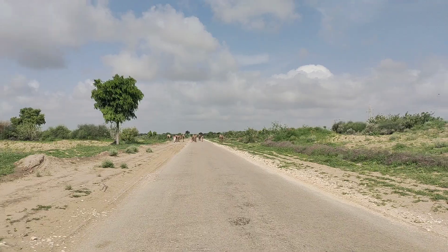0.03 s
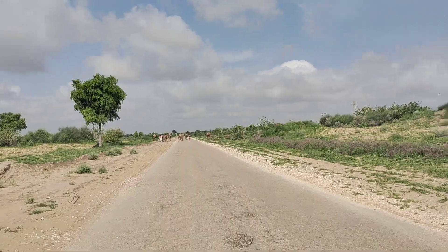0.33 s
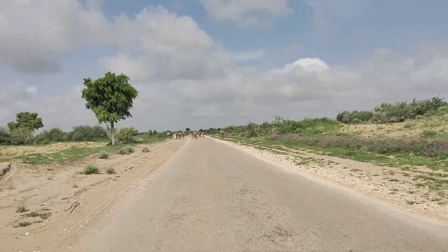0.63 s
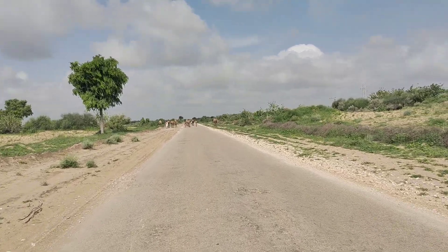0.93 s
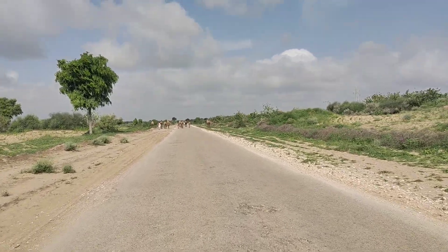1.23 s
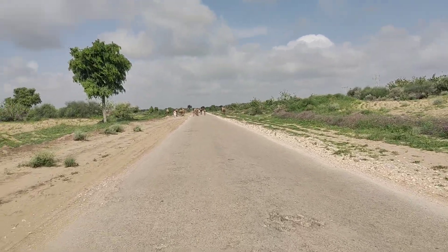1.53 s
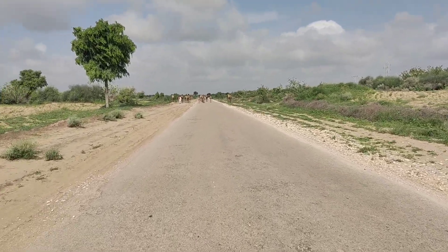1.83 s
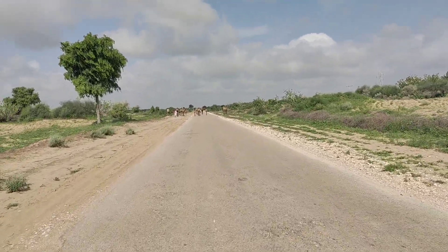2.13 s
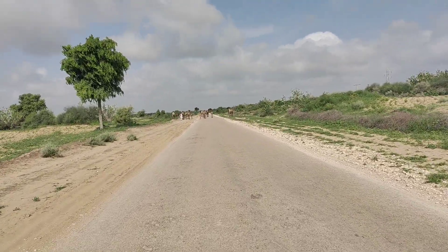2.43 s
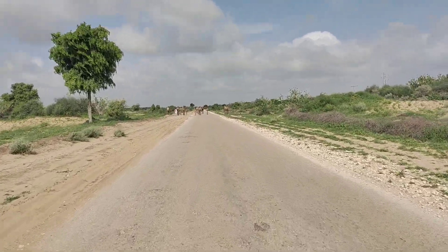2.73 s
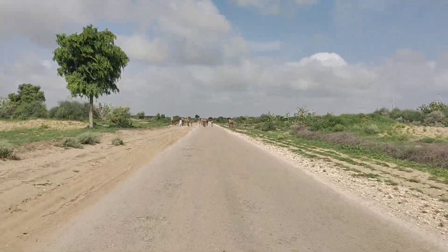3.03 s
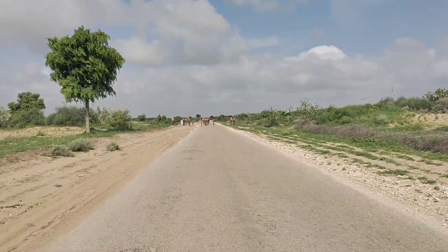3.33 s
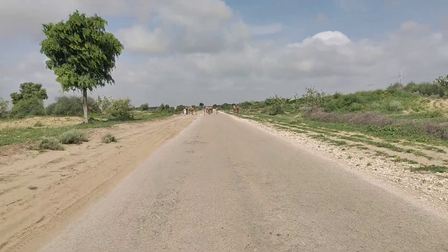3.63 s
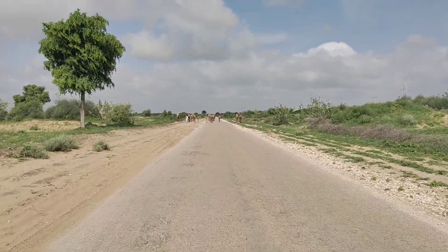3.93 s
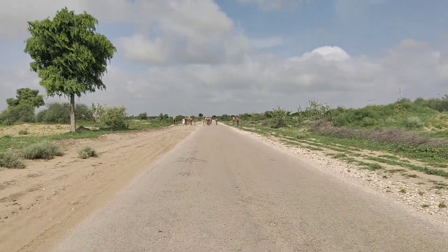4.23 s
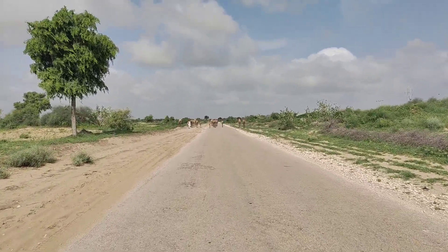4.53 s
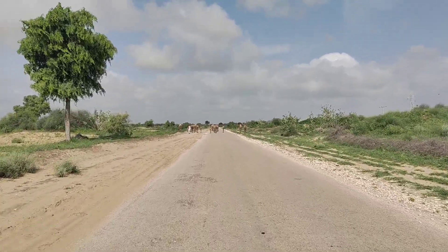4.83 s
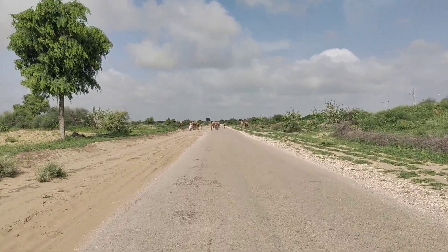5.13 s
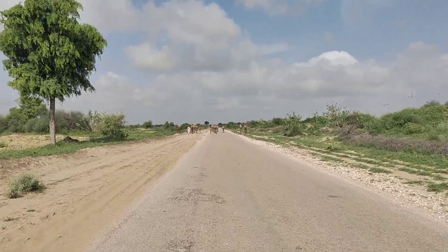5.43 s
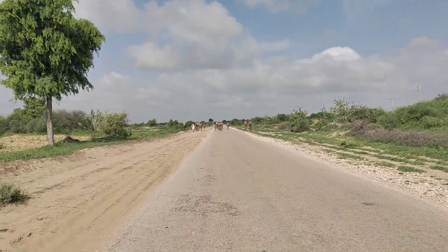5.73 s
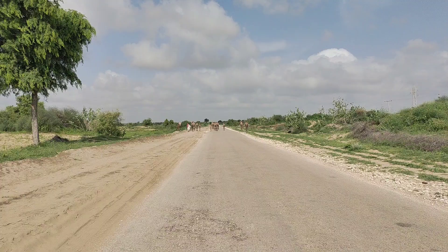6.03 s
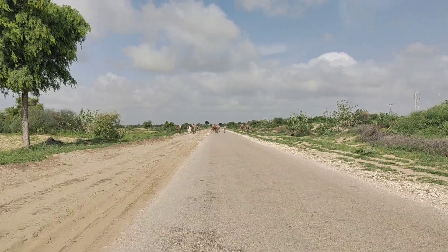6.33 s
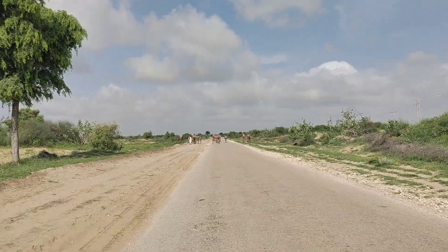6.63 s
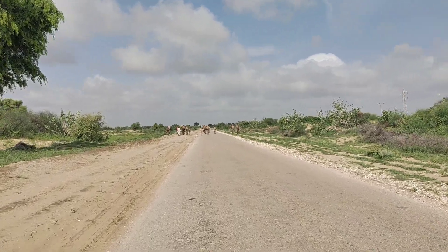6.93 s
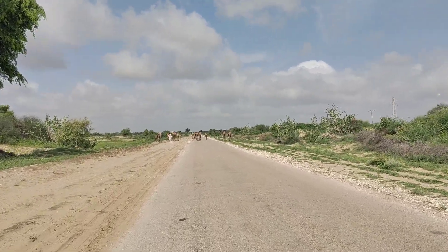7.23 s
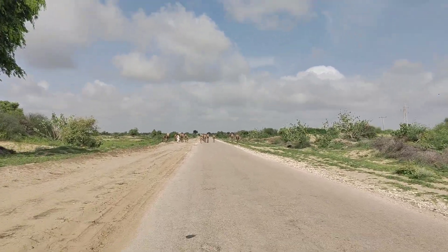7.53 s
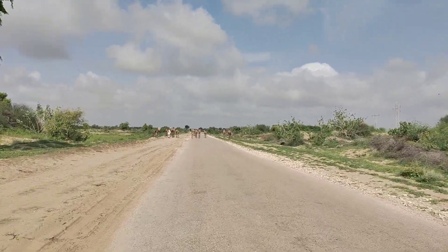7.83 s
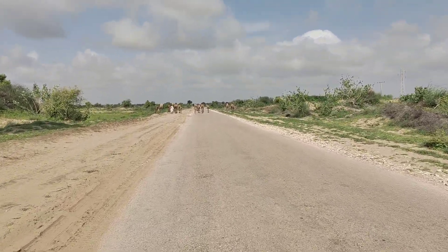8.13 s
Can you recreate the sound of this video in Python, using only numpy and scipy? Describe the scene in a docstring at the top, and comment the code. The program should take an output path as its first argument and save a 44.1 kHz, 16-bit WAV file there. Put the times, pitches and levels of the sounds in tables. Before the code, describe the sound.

A small motorbike rides along a country road, heard almost entirely on the left. Wind rumbles on the microphone, then eases, leaving a faint, steady engine tick, tyre hiss and a few soft hoots of air. The wind returns stronger, with low thumps, flutter and crackling spits that cover most of the bike. Near the end a loose part rattles lightly.

```python
"""Gusts of head wind rumble and thump on the left microphone port of a small motorbike on a country road.
The wind eases early on and returns stronger: large eddies give the rumble and the thumps, small ones
flutter, crackle and spit. Beneath it a single-cylinder engine ticks and rings its casing, the tyres hiss,
air hoots across the bodywork and a loose part rattles on rough patches. The right port is almost deaf."""
import sys
import numpy as np
from scipy import signal
from scipy.fft import rfft, irfft, next_fast_len
from scipy.io import wavfile
from scipy.ndimage import uniform_filter1d

SR = 44100
rng = np.random.default_rng(int(sys.argv[2]) if len(sys.argv) > 2 else 0)


def inscribe(sig):
    """Save sig as 16-bit PCM at rate SR to the path in sys.argv[1].

    A 1-D sig is mono; a 2-D sig holds one channel per row.
    Samples are clipped to [-1, 1] before scaling.
    """
    pcm = np.round(np.clip(np.atleast_2d(sig).T, -1, 1) * 32767)
    wavfile.write(sys.argv[1], SR, pcm.astype(np.int16))


N = 361179
TIME = np.arange(N) / SR

# Levels in the tables are relative: each source adds its own gain.
# faint puffs on the right port: start_s, length_s, level_db
RIGHT_PORT_PUFFS = [(.48, .1, -57), (1.64, 0.15, -60), (2.66, 0.073, -59), (2.97, 0.56, -58),
                    (3.6, 0.11, -53), (6.268, 0.3, -66.5), (8.09, .09, -59)]
# engine speed: time_s, firing_rate_hz
FIRING_RATE = [(0, 14.58), (1.2, 14.78), (2.4, 14.88), (3.4, 14.88), (4.4, 14.74), (5.4, 14.43),
               (6.6, 14.46), (8.2, 14.55)]
# mechanical ticks in one four-stroke cycle: cycle_fraction, strength_ratio
CYCLE_TICKS = [(.2, 1), (.49, 0.64), (.93, 0.3)]
# resonances of the engine casing: pitch_hz, width_hz, gain_db
CASING_MODES = [(789, 17, 9), (973, 68, 3.5), (1270, 15, 8), (1514, 52, 4.5), (1892, 37, 6), (2083, 32, -2),
                (2645, 10, -2.5), (3480, 53, 1), (3880, 88, -14.5)]
# bright engine clatter and road hiss: time_s, clatter_db, hiss_db
RIDE_LEVELS = [(.3, -55, -63), (1.1, -56, -61), (2.3, -56.5, -68), (2.85, -57.5, -66.5), (3.1, -56, -65),
               (3.6, -55.5, -66.5), (4.25, -55, -60.5), (4.6, -55, -62), (5.8, -56.5, -66),
               (6.95, -54, -62), (8.19, -54, -62)]
# brief dips of the bike's treble: start_s, length_s, gain_db
TREBLE_DIPS = [(3.013, 0.085, -5), (3.16, 0.21, -7), (3.937, 0.16, -6), (6.64, 0.12, -6.5)]
# top treble of the hiss: time_s, lift_db
HISS_TOP_LIFT = [(0.3, -6), (2.4, 9.5), (3.7, 7.5), (4.8, -11), (6.4, -7), (8.19, -6)]
# bands that sink in the hiss: start_s, length_s, centre_hz, width_hz, gain_db
HISS_HOLLOWS = [(1.77, 1.1, 4300, 2200, -2.5), (1.7, 1.2, 8400, 2500, -2.5), (4.4, 2.9, 8100, 760, -2.5)]
# faint rings in the hiss: start_s, length_s, pitch_hz, width_hz, level_db
HISS_RINGS = [(.3, 1.5, 5190, 220, -72), (1.796, 1.2, 6520, 600, -76), (1.8, 2.1, 5200, 90, -83),
              (3.4, 0.55, 5200, 300, -73), (4.15, 4.9, 7350, 900, -75)]
# air hooting across an opening in the bodywork: time_s, pitch_hz, level_db
BODYWORK_HOOTS = [(1.131, 454, -31), (1.24, 485, -43), (1.40, 461, -41.5), (1.56, 480, -39),
                  (1.80, 453, -37), (1.98, 466, -39)]
# knocks and light clinks of the loose part: time_s, peak_db
PART_KNOCKS = [(1.052, -44), (1.091, -40), (6.596, -36.5), (6.609, -33.5), (7.458, -35.5), (7.55, -31.5),
               (7.642, -40), (7.949, -32.5), (7.961, -42), (8.134, -34)]
PART_CLINKS = [(6.557, -46), (6.633, -43), (7.3397, -51), (7.3627, -44), (7.444, -42), (7.5785, -41),
               (8.0103, -39)]
# head wind under the gusts: time_s, rumble_db
HEAD_WIND = [(0.3, -19.5), (0.58, -24.5), (0.8, -32), (1.35, -37), (1.85, -37), (2.35, -41), (2.6, -25),
             (3.3, -29), (3.4, -26.5), (4.2, -28.5), (4.6, -23.5), (4.72, -26.5), (4.85, -25), (5.4, -25),
             (5.7, -22), (7.03, -21.5), (7.17, -26.5), (7.4, -21.5), (7.97, -23), (8.08, -28)]
# gusts on the left port: start_s, length_s, rumble_db, eddies_above_rumble_db
LEFT_PORT_GUSTS = [(0.336, 0.057, -18, -13.5), (0.401, 0.17, -22.5, -16.5), (0.6, 0.062, -35, -30),
                   (1.086, 0.043, -27, -26), (1.23, 0.049, -31.5, -25), (1.537, 0.065, -33, -21.5),
                   (1.982, 0.064, -34, -22), (2.393, 0.094, -26, -30), (2.672, 0.16, -24.5, -21.5),
                   (2.932, 0.087, -18, -33), (3.085, 0.23, -20, -28.5), (3.52, 0.045, -23.5, -21),
                   (3.69, 0.085, -20.5, -19), (3.764, 0.09, -21, -16.5), (3.91, 0.026, -15.5, -20),
                   (3.989, 0.028, -19.5, -15.5), (4.086, 0.17, -21.5, -16), (4.306, 0.036, -21, -11),
                   (4.376, 0.084, -23, -16), (4.452, 0.16, -25.5, -20), (4.778, 0.16, -24.5, -15),
                   (4.984, 0.071, -21, -17.5), (5.24, 0.14, -32.5, -10.5), (5.433, 0.66, -22, -13.5),
                   (6.111, 0.12, -23.5, -12), (6.336, 0.15, -27, -10), (6.463, 0.047, -16.5, -19.5),
                   (6.588, 0.16, -28, -8.5), (6.828, 0.059, -19.5, -16), (7.236, 0.29, -26, -15.5),
                   (7.747, 0.094, -24, -15)]
# weight of the lowest rumble: time_s, lift_db
DEEP_RUMBLE_LIFT = [(0.3, 12), (1.6, 7), (3.2, 7.5), (4.8, 8.5), (5.8, 14), (6.7, 6.5), (7.5, 7)]
# single large eddies striking the port: time_s, thump_db, pop_db
LARGE_EDDIES = [(0.328, -28, -20), (0.368, -17, -35), (0.404, -15, -31), (0.433, -11, -38),
                (0.462, -29, -21), (0.551, -20, -25), (2.714, -8, -21), (2.825, -6, -19.5),
                (2.857, -11.5, -23.5), (2.95, -13, -43), (2.976, -19, -39), (3.0138, -10.5, -24),
                (3.024, -13, -40), (3.148, -10.5, -35), (3.1642, -5, -15.5), (3.184, -7, -41),
                (3.191, -11, -23), (3.202, -13, -15.5), (3.242, -7.5, -15), (3.251, -17, -18.5),
                (3.264, -28, -26.5), (3.32, -13.5, -26.5), (3.543, -30, -24), (3.949, -10, -19),
                (3.993, -10, -24), (4.024, -14, -24), (4.137, -23, -27), (4.323, -27, -20),
                (4.614, -11.5, -32), (4.922, -11, -21), (5.048, -9.5, -19), (5.27, -11, -21.5),
                (5.305, -5, -26), (5.546, -11.5, -16.5), (5.62, -11, -17), (5.66, -5, -19),
                (5.781, -17, -25), (5.832, -10.5, -27), (5.997, -14, -20), (6.145, -27, -19.5),
                (6.184, -13, -19.5), (6.353, -12, -28), (6.458, -16, -16.5), (6.595, -16, -36),
                (6.645, -7.5, -19), (6.688, -11.5, -13.5), (6.856, -10, -33), (6.959, -9.5, -23),
                (7.343, -30, -18), (7.581, -14.5, -20.5), (7.609, -13, -25), (7.677, -13.5, -26),
                (7.785, -9.5, -20.5)]
# spits as the strongest gusts tear at the port: time_s, peak_db
PORT_SPITS = [(0.3784, -34), (0.399, -35), (0.4757, -34), (3.17, -34.5), (3.204, -47), (5.5015, -31),
              (5.5615, -30.5), (5.5725, -30), (5.5875, -31), (5.6118, -32), (5.632, -28.5), (5.773, -27),
              (5.7895, -32), (5.833, -33.5), (5.8695, -26.5), (5.89, -30), (5.913, -26.5), (6.018, -42),
              (6.04, -29.5)]
# spectral envelopes of the sources: frequency_hz, gain_db
RIGHT_HISS_SPECTRUM = [(30, 0), (100, -24), (400, -1), (1000, 2.5), (3000, -2.5), (6000, -9),
                       (15000, -10.5)]
CLATTER_SPECTRUM = [(100, 1.5), (400, 8.5), (650, 2), (1000, 5.5), (1900, 1.5), (2900, -5), (3800, -6.5),
                    (4600, -21), (7000, -23), (15000, -52)]
ROAD_SPECTRUM = [(1000, 12), (4000, 1.5), (5500, -0.5), (7200, 4), (8200, 1), (9900, 6.5), (11000, 3.5),
                 (13000, 3.5), (15500, -3)]
KNOCK_SPECTRUM = [(900, 11), (1700, 16), (2400, 13.5), (3300, 7.5), (4400, 9.5), (6000, -15), (7500, -2),
                  (10000, -29), (15000, -30)]
SCRAPE_SPECTRUM = [(2000, -12), (4300, 4), (6000, 1), (7500, 6), (10000, -3), (13500, -7), (15500, -16)]
CRACKLE_SPECTRUM = [(200, -15), (600, 4.5), (1200, 0.5), (2200, -10.5), (3500, -23.5), (7000, -37),
                    (9000, -56)]
POP_SPECTRUM = [(120, -23), (300, -4.5), (550, 9.5), (900, 3.5), (1500, -9), (2500, -22.5), (4000, -35),
                (7000, -58), (12000, -81)]
WIND_SPECTRUM = [(20, -49), (42, -25), (62, -13), (85, -0.5), (150, 0.5), (250, -4.5), (450, -12),
                 (750, -21.5), (1300, -32), (2200, -43.5), (4000, -57), (7000, -68), (12000, -83.5)]
SPIT_SPECTRUM = [(300, 26.5), (1200, 8), (2500, -2.5), (4000, -17), (7200, -23.5), (8500, -41), (15000, -52)]


def amp(db):
    """Amplitude ratio of a level in decibels."""
    return 10 ** (np.asarray(db) / 20)


def unit(x):
    """Normalisation to rms 1."""
    return x / np.sqrt(np.mean(x ** 2))


def curves(table):
    """Linear interpolation of each column over time."""
    times, *columns = np.transpose(table)
    return [np.interp(TIME, times, column) for column in columns]


def shape(x, response):
    """Linear filtering: the spectrum is multiplied by a frequency response."""
    size = next_fast_len(N + SR // 10, True)
    hz = np.maximum(np.arange(size // 2 + 1) * SR / size, 1)
    return irfft(rfft(x, size) * response(hz), size)[:N]


def colour(x, spectrum):
    """Filtering by a spectral envelope on a log-frequency axis."""
    points_hz, db = np.transpose(spectrum)
    return shape(x, lambda hz: amp(np.interp(np.log(hz), np.log(points_hz), db)))


def split(x, hz):
    """Complementary crossover: the parts below and above a frequency."""
    low = shape(x, lambda f: 1 / (1 + (f / hz) ** 4))
    return low, x - low


def noise():
    """Gaussian white noise of rms 1."""
    return rng.standard_normal(N)


def narrow(hz, width_hz):
    """Resonance driven by noise, rms 1."""
    return unit(shape(noise(), lambda f: 1 / (1 + (2 * (f - hz) / width_hz) ** 2)))


def walk(rate_hz):
    """Smooth random modulation: low-passed noise of rms 1."""
    return unit(shape(noise(), lambda hz: 1 / (1 + (hz / rate_hz) ** 2) ** 2))


def jolts(rate_hz):
    """Random modulation without slow drift or far outliers, rms 1."""
    x = walk(rate_hz)
    return unit(np.tanh(unit(x - uniform_filter1d(x, SR // 20)) / 2))


def swell(start_s, length_s, attack_s=0.023, release_s=0.026):
    """Envelope with a linear attack, a hold and an exponential release."""
    attack = np.clip((TIME - start_s) / attack_s, 0, 1)
    return attack * np.exp(-np.maximum(TIME - start_s - length_s, 0) / release_s)


def damped(impulses, decay_s):
    """Exponential decay after each impulse."""
    return signal.lfilter([1], [1, -np.exp(-1 / (decay_s * SR))], impulses)


def strikes(table, decay_s):
    """Impulsive excitation: a force jumps at each (time_s, peak_db) row and decays."""
    force = np.zeros(N)
    for time_s, db in table:
        force[int(time_s * SR)] += amp(db)
    return damped(force, decay_s)


def right_port(rumble_db=-65, sway_db=7, hiss_db=-68):
    """Incoherent addition: a trace of wind and faint puffs sum in power over a thin hiss."""
    power = amp(rumble_db + sway_db * walk(2.9)) ** 2
    power += sum((amp(db) * swell(start_s, length_s)) ** 2 for start_s, length_s, db in RIGHT_PORT_PUFFS)
    rumble = np.sqrt(power) * unit(colour(noise(), WIND_SPECTRUM))
    return rumble + amp(hiss_db) * unit(colour(noise(), RIGHT_HISS_SPECTRUM))


def hiss_rings(sway_db=2):
    """Narrow-band noise is heard as faint rings that waver in level and step in pitch."""
    sway = amp(sway_db * walk(12))
    return sway * sum(amp(db) * swell(start_s, length_s) * narrow(hz, width_hz)
                      for start_s, length_s, hz, width_hz, db in HISS_RINGS)


def hollowed(x):
    """Band-stop filtering: shallow notches leave the hiss hollow for a while."""
    for start_s, length_s, centre_hz, width_hz, db in HISS_HOLLOWS:
        band = shape(x, lambda hz: 1 / (1 + (2 * (hz - centre_hz) / width_hz) ** 4))
        x = x + (amp(db) - 1) * swell(start_s, length_s) * band
    return x


def treble_dips_db():
    """Attenuation that briefly dulls the bike's treble."""
    return sum(db * swell(start_s, length_s) for start_s, length_s, db in TREBLE_DIPS)


def tyre_grit(rate_hz=16, decay_s=0.004, spread_db=3, gain_db=-1):
    """Random impacts: grit ticks under the tyres, following the top treble of the road hiss."""
    hits = (rng.random(N) < rate_hz / SR) * amp(spread_db * np.tanh(noise()))
    level_db = gain_db + curves(RIDE_LEVELS)[1] + curves(HISS_TOP_LIFT)[0] + treble_dips_db()
    return amp(level_db) * damped(hits, decay_s) * narrow(hz=12200, width_hz=4500)


def ticking(ticks, decay_cycles, uneven_db=0.71):
    """Periodic excitation: the envelope of ticks that repeat with each firing."""
    cycles = np.cumsum(curves(FIRING_RATE)[0]) / SR
    envelope = sum(strength * np.exp(-((cycles - phase) % 1) / decay_cycles) for phase, strength in ticks)
    return envelope * amp(uneven_db * walk(24))


def valve_chink(level_db=-69, uneven_db=3):
    """Impact resonance: one valve closes with a thin chink in each cycle, with uneven force."""
    force = amp(level_db + uneven_db * jolts(15)) * ticking([(CYCLE_TICKS[0][0], 1)], decay_cycles=0.16)
    return force * narrow(hz=9920, width_hz=350)


def engine_and_road(low_db=-45.5, bright_db=10, casing_db=1, road_db=3, engine_tick=0.71, hiss_tick=1.6):
    """Forced vibration: ticks and gear noise ring the casing modes; tyres and chain hiss above."""
    clatter_db, hiss_db = curves(RIDE_LEVELS) + treble_dips_db()
    ticks = ticking(CYCLE_TICKS, decay_cycles=0.12)
    pulsing = 1 + engine_tick * ticks
    casing = shape(noise() * pulsing, lambda hz: sum(
        amp(db) / (1 + 1j * (hz - mode_hz ** 2 / hz) / width_hz) for mode_hz, width_hz, db in CASING_MODES))
    clatter = unit(colour(noise() * pulsing, CLATTER_SPECTRUM) + amp(casing_db) * casing)
    # the low clatter stays even; the bright part swells and dips
    low, bright = split(clatter, hz=1450)
    grainy = noise() * (1 + hiss_tick * ticks) * amp(-walk(600))  # 1 dB of fine grain
    hiss, top = split(unit(colour(grainy, ROAD_SPECTRUM)), hz=12300)
    hiss = hiss + amp(curves(HISS_TOP_LIFT)[0]) * top
    return amp(low_db) * low + amp(clatter_db + bright_db) * bright + amp(hiss_db + road_db) * hiss


def bodywork_drone(boom_db=-44, hum_db=-53, hoot_s=0.018, sway_db=3.5):
    """Flow-excited resonance: the bike booms softly, and air hums and hoots across its bodywork."""
    drone = amp(boom_db) * narrow(hz=148, width_hz=37) + amp(hum_db) * narrow(hz=482, width_hz=130)
    drone *= amp(sway_db * walk(22))
    wavering_time = np.cumsum(1 + 0.0217 * walk(27)) / SR
    for time_s, hz, db in BODYWORK_HOOTS:
        envelope = amp(db) * np.exp(-((TIME - time_s) / hoot_s) ** 2)
        drone += envelope * np.sin(2 * np.pi * hz * wavering_time)
    return drone


def loose_part_clinks(decay_s=0.0015, gain_db=-3):
    """Brief glancing contacts excite only the highest resonance of the loose part."""
    return amp(gain_db) * strikes(PART_CLINKS, decay_s) * narrow(hz=9200, width_hz=2000)


def loose_part_rattle(bounce_s=0.0081, rebound=0.27, shiver_s=0.054,
                      knock_db=-2.5, shiver_db=-27, scrape_db=-10, hiss_db=-28):
    """Contact noise: a shaken part shivers, knocks with a bright scrape and rebounds once."""
    force = strikes(PART_KNOCKS, decay_s=0.0091)
    force = force + rebound * np.roll(force, int(bounce_s * SR))
    shiver = sum(amp(db) * np.exp(-np.abs(TIME - time_s - bounce_s) / shiver_s)
                 for time_s, db in PART_KNOCKS)
    crack = (amp(knock_db) * force + amp(shiver_db) * shiver) * unit(colour(noise(), KNOCK_SPECTRUM))
    contact = uniform_filter1d(strikes(PART_KNOCKS, decay_s=0.0038), 44)  # onset softened over 1 ms
    roughness = amp(3 * jolts(700))
    scrape = amp(scrape_db) * contact * roughness * unit(colour(noise(), SCRAPE_SPECTRUM))
    return crack + scrape + amp(hiss_db) * shiver * unit(colour(noise(), ROAD_SPECTRUM))


def airflow(brisk_db=-19.5, eddy_offset_db=-12.5, eddy_db_per_db=1.62):
    """Amplitudes of the rumble and of the small eddies: gusts and head wind add in power."""
    flow_db = curves(HEAD_WIND)[0]
    rumble_power = amp(flow_db) ** 2
    # small eddies grow faster with the flow than the rumble does
    eddy_power = amp(flow_db + eddy_offset_db + eddy_db_per_db * (flow_db - brisk_db)) ** 2
    for start_s, length_s, db, eddy_db in LEFT_PORT_GUSTS:
        gust = amp(db) * swell(start_s, length_s)
        rumble_power += gust ** 2
        eddy_power += (amp(eddy_db) * gust) ** 2
    return np.sqrt(rumble_power), np.sqrt(eddy_power)


def eddy_crackle(peak_rate_hz=75, spread_db=3, level_db=-46, growth=0.55):
    """Intermittency: small eddies burst as dry pops, denser and louder as the flow grows."""
    _, eddies = airflow()
    strength = eddies / eddies.max()
    hits = rng.random(N) < peak_rate_hz * strength / SR
    pops = hits * strength ** growth * amp(spread_db * np.tanh(noise()))
    return amp(level_db) * unit(colour(pops, CRACKLE_SPECTRUM))


def port_spits(decay_s=0.0012, gain_db=12.5):
    """Broadband transients: air breaks at the port in brief cracks."""
    return amp(gain_db) * colour(strikes(PORT_SPITS, decay_s) * noise(), SPIT_SPECTRUM)


def buffets(width_s=0.00099, rise_s=0.001417, thump_db=2, snap_db=5.5, tear_db=5):
    """Pressure pulse: a large eddy is one crest between two troughs; its steep edge pops and tears."""
    thumps = np.zeros(N)
    stretches = rng.uniform(0.73, 1.57, len(LARGE_EDDIES))
    for (time_s, db, _), stretch in zip(LARGE_EDDIES, stretches):
        near = np.abs(TIME - time_s) < 0.03
        offset = (TIME[near] - time_s - rise_s) / (width_s * stretch)
        thumps[near] += amp(db + thump_db) * (1 - offset ** 2) * np.exp(-offset ** 2 / 2)
    pops = [(time_s + rise_s, pop_db) for time_s, _, pop_db in LARGE_EDDIES]
    snap = amp(snap_db) * strikes(pops, decay_s=0.00034)
    tear = amp(tear_db) * strikes(pops, decay_s=0.004) * noise()
    return thumps + colour(snap + tear, POP_SPECTRUM)


def lulls(depth_db=-6, lead_s=0.0056, width_s=0.0034):
    """Displacement: the wind's gain dips as each large eddy pushes smaller turbulence aside."""
    return amp(sum(depth_db * np.exp(-((TIME - time_s + lead_s) / width_s) ** 2)
                   for time_s, _, _ in LARGE_EDDIES))


def flaps(rate_hz=150, spread_db=5, push_share=0.75):
    """Shot noise: separate eddies of uneven size hit at random, most as a push; white, rms 1."""
    hits = rng.random(N) < rate_hz / SR
    polarity = np.where(rng.random(N) < push_share, 1, -1)
    return unit(hits * polarity * amp(spread_db * np.tanh(noise())))


def wind(burst_db=1.3, fine_db=-4, fine_spread_db=3.5, tearing=0.3, low_flap=0.57, high_flap=0.66,
         eddy_db=2.5, surge_db=1.3, eddy_surge_db=1.63):
    """Turbulent cascade: big eddies rumble, smaller ones flutter in bursts and the finest spit."""
    rumble, eddies = airflow()
    # smooth turbulence and single flaps share the port's response
    big, rest = split(colour(noise(), WIND_SPECTRUM), hz=452)
    small, finest = split(rest, hz=1000)
    slow_flaps, fast_flaps = split(colour(flaps(), WIND_SPECTRUM), hz=557)
    mid_flaps, _ = split(fast_flaps, hz=2400)
    deep, body = split(unit(big + low_flap * slow_flaps), hz=61)
    pressure = body + amp(curves(DEEP_RUMBLE_LIFT)[0]) * deep
    bursts = amp(burst_db * jolts(110))
    # the stronger the flutter, the more of it tears into the finest scale
    fine_gain = amp(fine_db + fine_spread_db * jolts(340)) * unit(eddies) ** tearing
    rasp = unit(bursts * (small + fine_gain * finest))
    flutter = unit(rasp + high_flap * unit(mid_flaps))
    surge = jolts(32)  # the whole flow surges unevenly
    rumbling = rumble * amp(surge_db * surge) * pressure
    return rumbling + eddies * amp(eddy_db + eddy_surge_db * surge) * flutter


def scene():
    """Superposition: wind and bike sum on the left; the right port catches only a trace of wind."""
    air = wind() * lulls() + buffets() + port_spits() + eddy_crackle()
    bike = hollowed(engine_and_road()) + hiss_rings() + valve_chink() + tyre_grit() + bodywork_drone()
    bike += loose_part_rattle() + loose_part_clinks()
    return np.array([2 * (air + bike), right_port()])


def record(dry, start_s=0.294, fade_s=0.079, low_cut_hz=48, ceiling=0.93, top_hz=15450):
    """Band limiting and soft saturation round the thumps; the sound fades in after a brief silence."""
    fade_in = np.sqrt(np.clip((TIME - start_s) / fade_s, 0, 1))
    thinned = np.array([shape(side, lambda hz: 1 / (1 + (low_cut_hz / hz) ** 3)) for side in dry])
    rounded = thinned / (1 + (thinned / ceiling) ** 4) ** (1 / 4)
    low_pass = signal.ellip(10, 0.2, 80, top_hz, fs=SR, output="sos")
    return signal.sosfilt(low_pass, rounded * fade_in)


dry = scene()
out = record(dry)
inscribe(out)
```